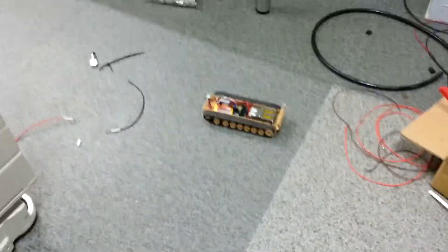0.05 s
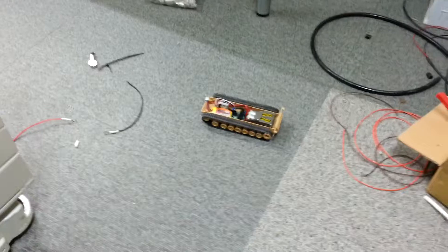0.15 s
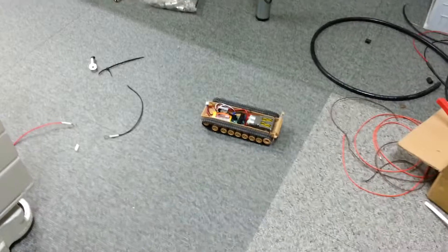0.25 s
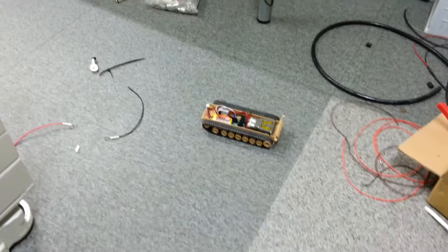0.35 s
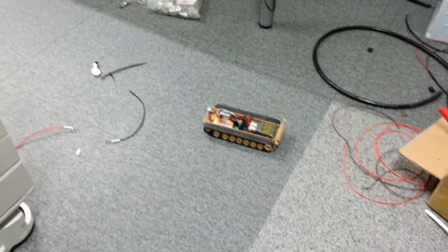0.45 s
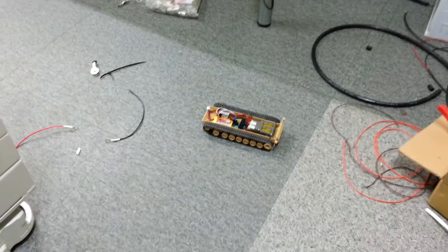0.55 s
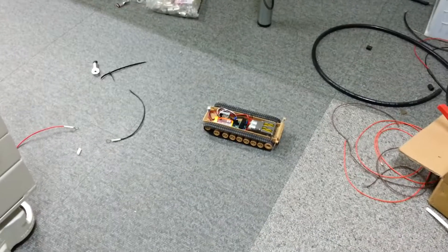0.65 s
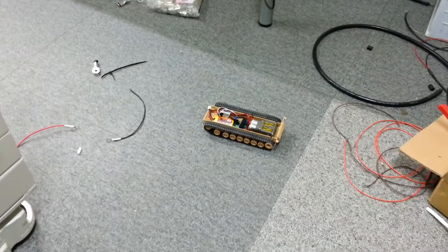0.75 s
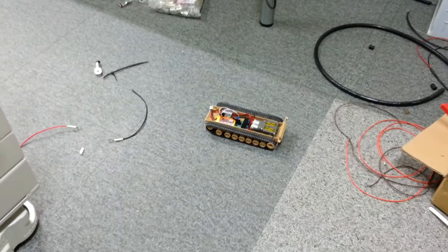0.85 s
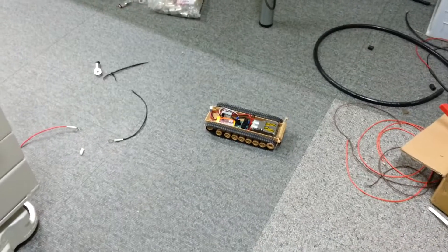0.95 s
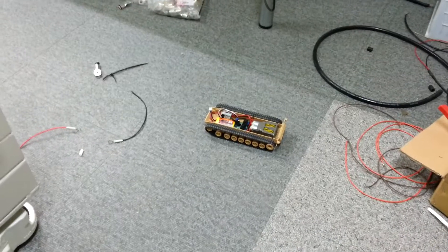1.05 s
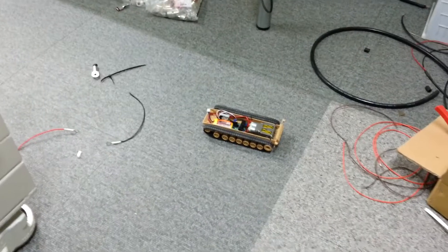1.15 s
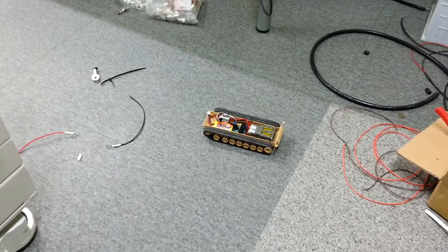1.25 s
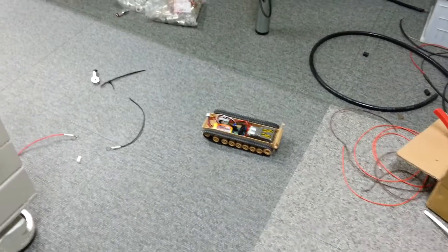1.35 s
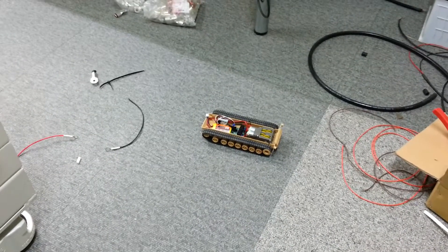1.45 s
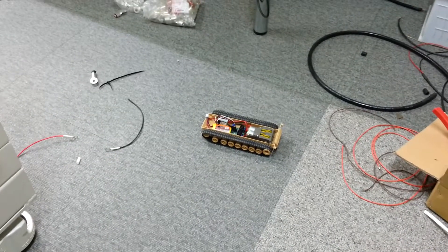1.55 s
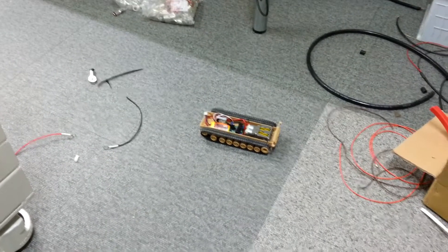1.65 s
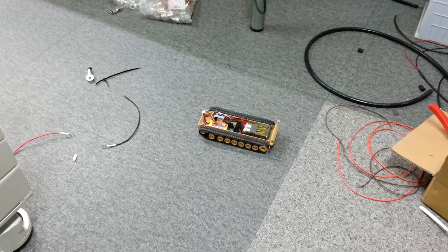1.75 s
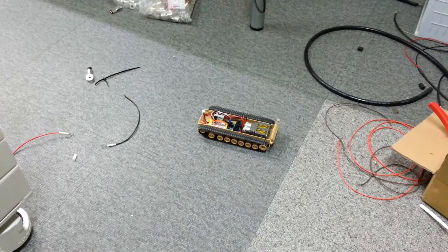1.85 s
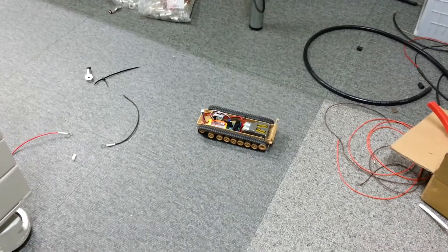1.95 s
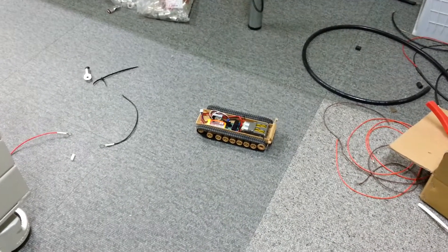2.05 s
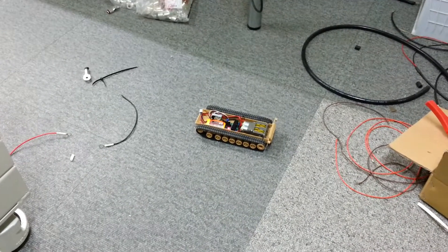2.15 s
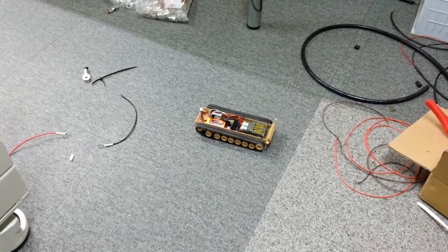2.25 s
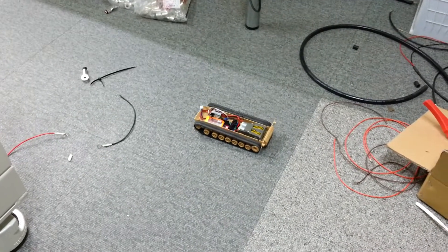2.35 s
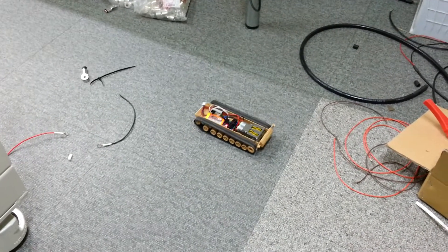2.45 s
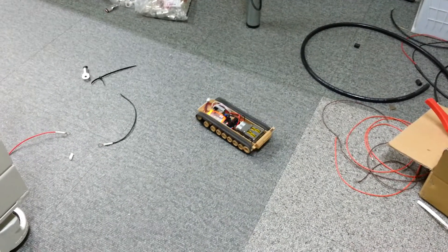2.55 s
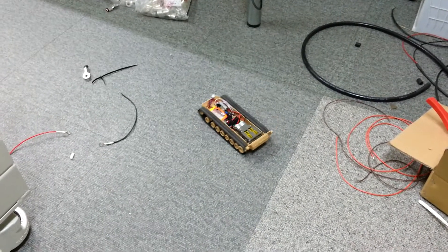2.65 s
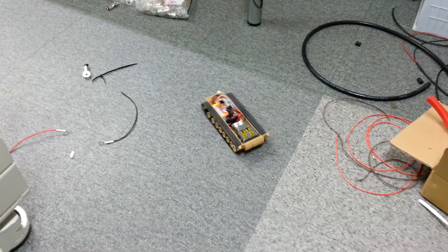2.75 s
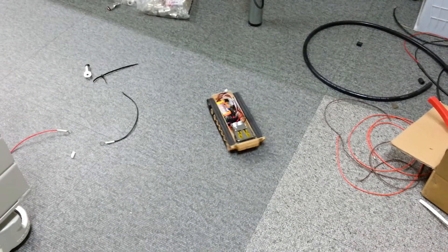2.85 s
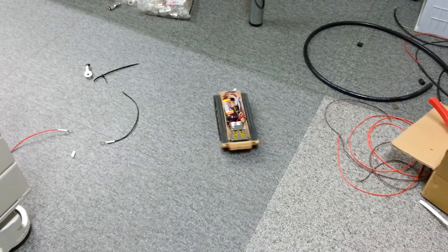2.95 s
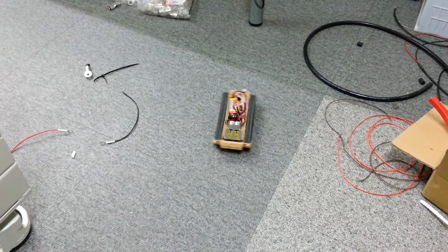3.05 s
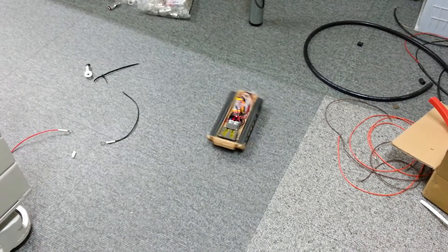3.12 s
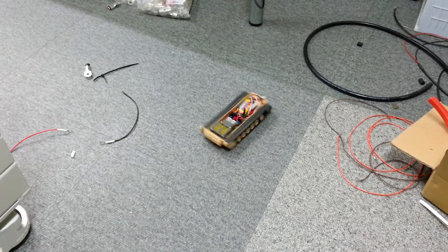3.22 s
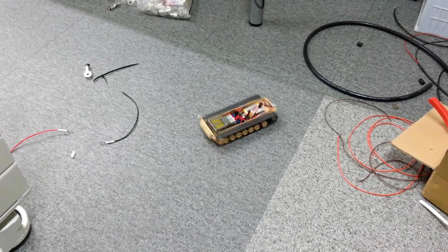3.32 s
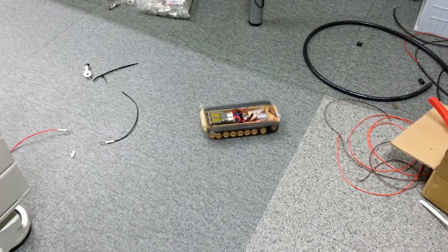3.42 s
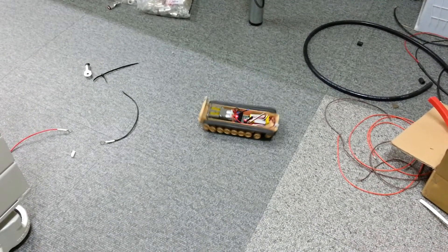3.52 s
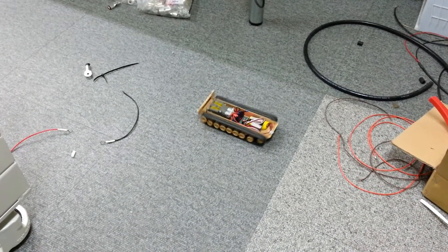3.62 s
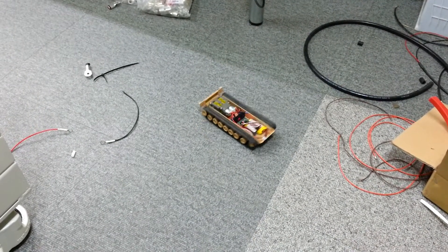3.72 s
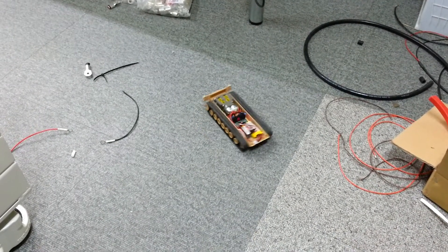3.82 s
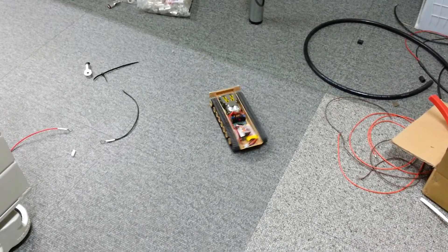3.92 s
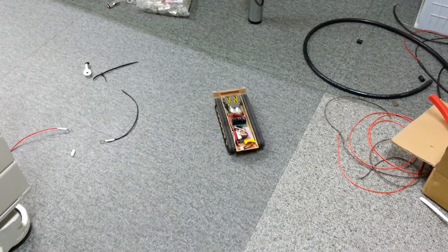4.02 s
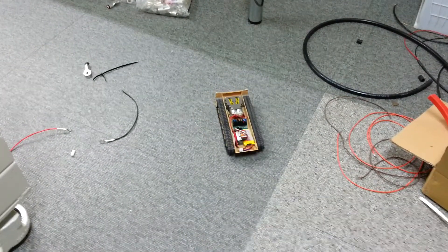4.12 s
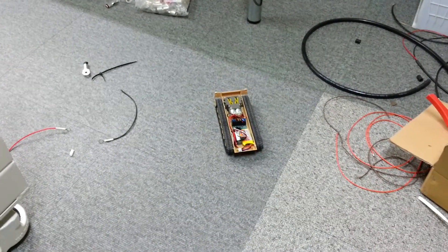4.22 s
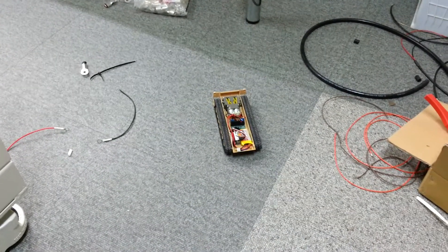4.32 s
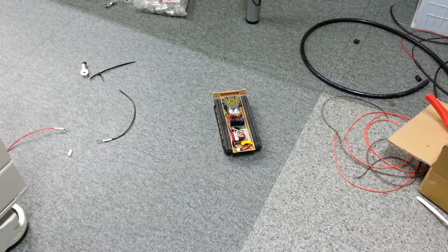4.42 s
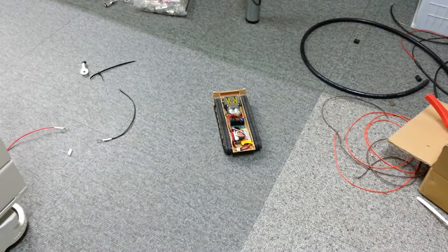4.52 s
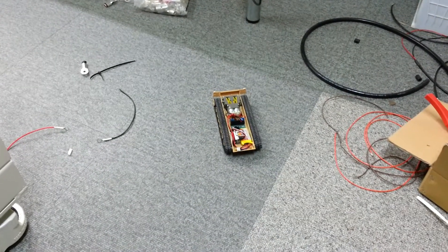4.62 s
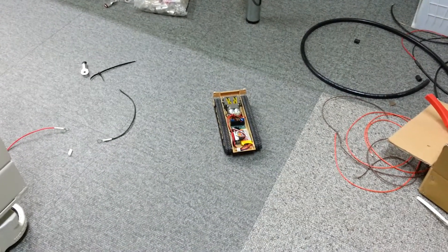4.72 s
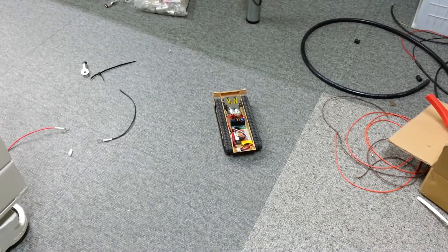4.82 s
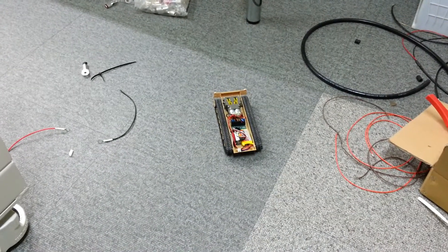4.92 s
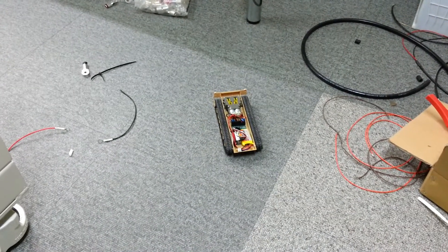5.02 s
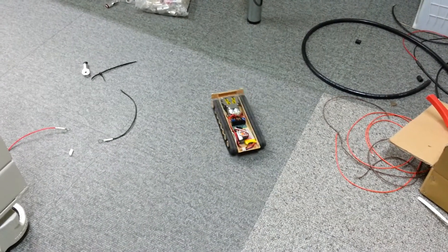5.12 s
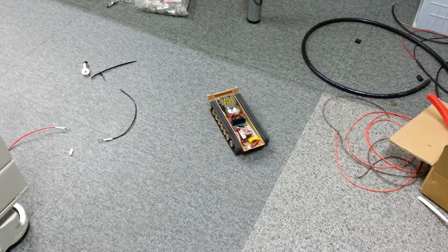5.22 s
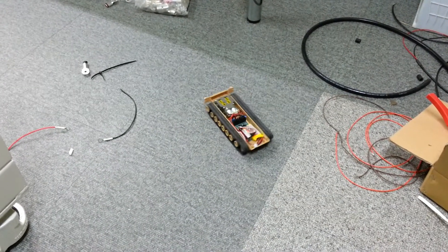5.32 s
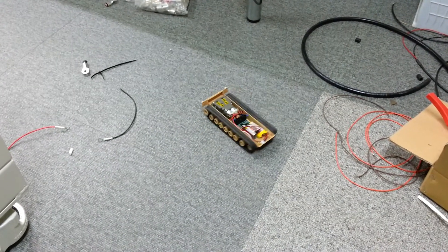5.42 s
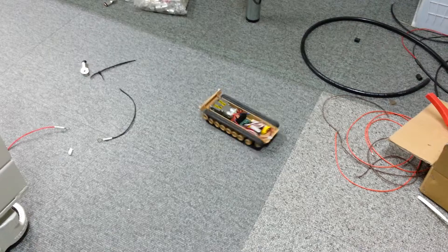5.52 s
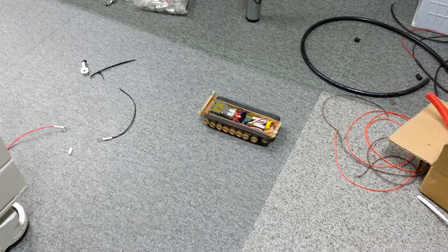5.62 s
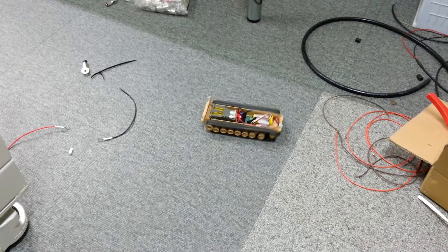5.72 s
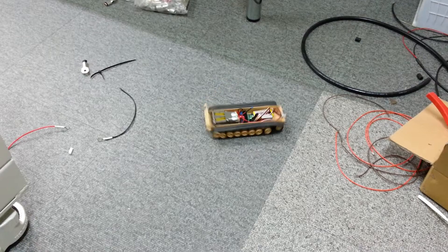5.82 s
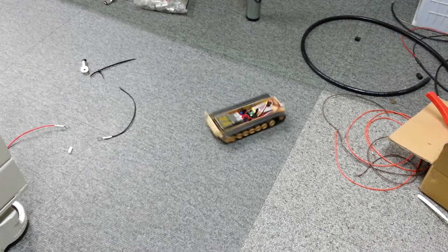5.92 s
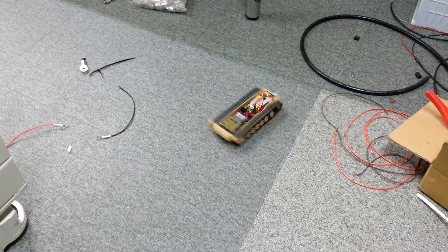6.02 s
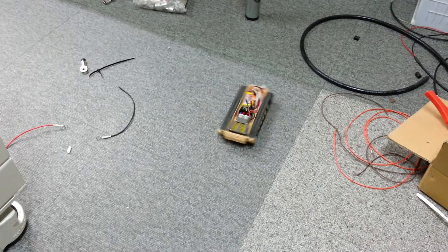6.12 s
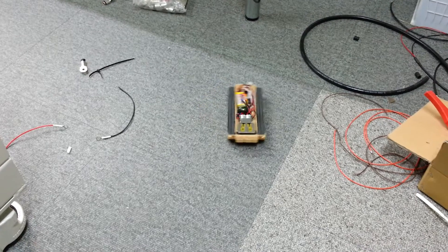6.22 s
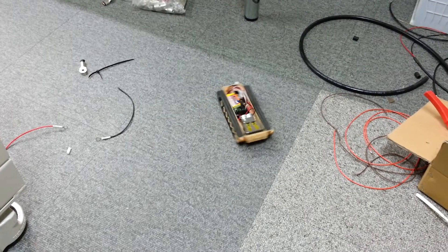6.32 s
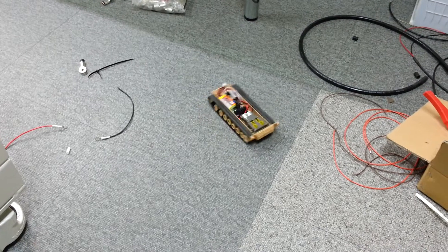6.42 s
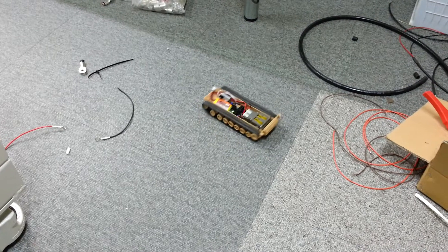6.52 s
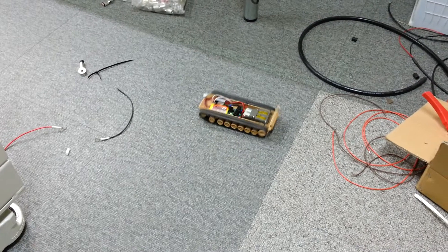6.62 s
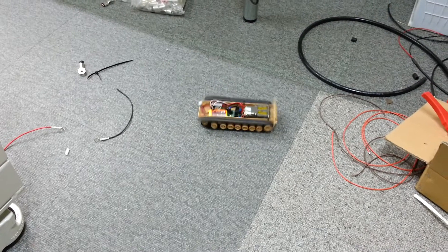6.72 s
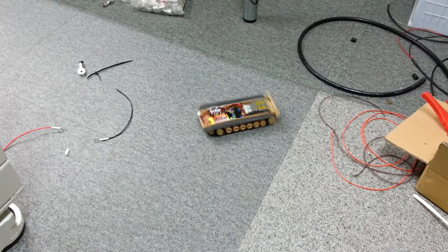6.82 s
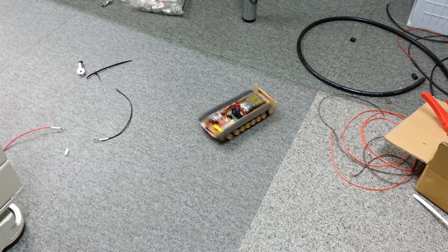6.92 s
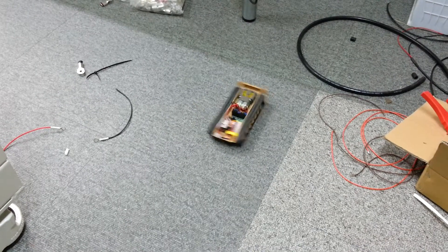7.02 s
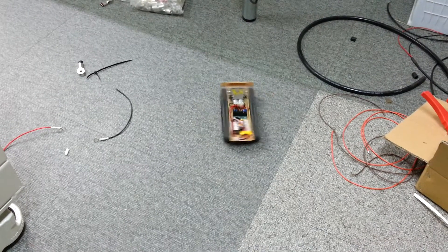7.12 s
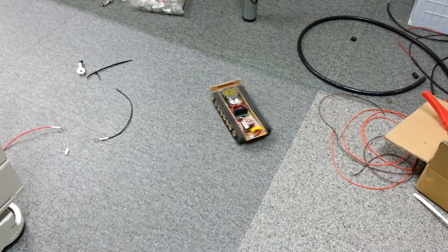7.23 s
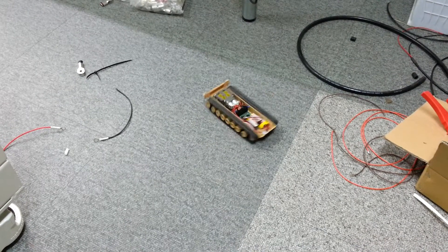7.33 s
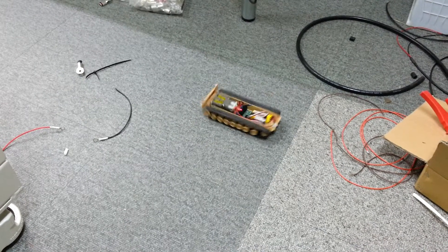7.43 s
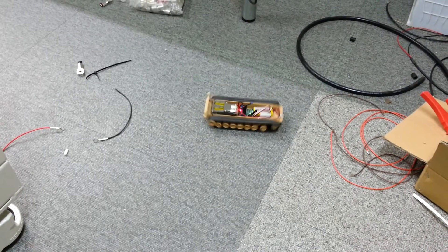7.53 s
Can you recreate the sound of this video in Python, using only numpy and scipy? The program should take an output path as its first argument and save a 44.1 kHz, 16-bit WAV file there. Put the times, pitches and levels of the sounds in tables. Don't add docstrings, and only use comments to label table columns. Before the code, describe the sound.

A quiet carpeted room with steady low room tone and soft hiss. Almost at once, at 0.04 s, a light plastic case is knocked close to the microphone, bouncing several times within a few hundredths of a second, then dragging grittily until about 0.3 s. A faint, grainy servo whine lies under it and dies by 1.2 s. Near quiet follows. At 2.2 s a small tracked model starts spinning: two little motors whine upward, rough and wavering, over loud, dry, plastic gear rattle. At about 4 s one surges briefly, then they slow and stop by 4.3 s. Quiet again until 5.0 s, when a second burst kicks in, dips briefly, then climbs higher and brighter, with beating whines, low hum and fizzy brush noise. One motor sags and restarts around 7.2 s; the rattle is still running at the 7.6 s end.

```python
import sys
import numpy as np
from scipy import signal
from scipy.fft import rfft, irfft, next_fast_len
from scipy.io import wavfile
from scipy.ndimage import uniform_filter1d, map_coordinates

SR = 44100
rng = np.random.default_rng(int(sys.argv[2]) if len(sys.argv) > 2 else 0)


def pcm_store(signal):
    levels = np.round(np.clip(np.atleast_2d(signal), -1, 1) * 32767)
    wavfile.write(sys.argv[1], SR, levels.astype(np.int16).T)


def gain_from_decibels(decibels):
    exponent = np.asarray(decibels, float) / 20
    return 10 ** exponent


N = 333837
TIME_S = np.arange(N) / SR


def unit(x):
    return x / np.sqrt(np.mean(np.abs(x) ** 2) + 1e-20)


def along(points, hz):
    point_hz, value = np.transpose(points)
    return np.interp(np.log(hz + 1), np.log(point_hz + 1), value)


def curves(rows, fade_s=0.011):
    start_s, *columns = np.transpose(rows)
    inside_s = np.minimum(TIME_S - start_s[0], start_s[-1] + fade_s - TIME_S)
    gate = np.clip(inside_s / fade_s, 0, 1)
    return [gate] + [np.interp(TIME_S, start_s, column) for column in columns]


def wobble(rate_hz):
    return map_coordinates(rng.standard_normal(N // 20), [TIME_S * rate_hz])


def filtered(x, response):
    size = next_fast_len(N + SR // 2)
    hz = np.fft.rfftfreq(size, 1 / SR)
    return irfft(rfft(x, size) * response(hz), size)[..., :N]


def coloured(x, spectrum):
    return unit(filtered(x, lambda hz: gain_from_decibels(along(spectrum, hz))))


def turning(shaft_hz, chatter=1):
    flutter = 0.012
    return np.cumsum(shaft_hz * (1 + flutter * chatter * wobble(45))) / SR


def order(turns, multiple, rough, rate_hz):
    slow = wobble(rate_hz) + 1j * wobble(rate_hz)
    fast = 0.55 * wobble(4 * rate_hz) + 0.6j * wobble(4 * rate_hz)
    error = (1 + rough * (slow + fast)) / np.sqrt(1 + 2 * rough ** 2)
    return unit(np.real(error * np.exp(2j * np.pi * multiple * turns)))


# centre_hz, width_hz, level_db
HULL_PANELS = [(1076, 200, -5.5), (1328, 32, 1), (1708, 36, 7.5), (1868, 88, 6), (2120, 110, 0),
               (2420, 82, -4.5), (3010, 250, 1.5), (3395, 78, 3.5), (4035, 30, 3), (4480, 320, -0.5)]


def hull(hz):
    response = 1
    for centre_hz, width_hz, level_db in HULL_PANELS:
        damping = 1j * hz * width_hz
        response = response + gain_from_decibels(level_db) * 0.5 * damping / (centre_hz ** 2 - hz ** 2 + damping)
    return response


# hz, level_db (per Hz)
GEAR_SPECTRUM = [(240, -61), (400, -33), (608, -27.5), (939, -17.5), (1410, -10), (1630, -4), (1980, -6),
                 (2140, -0.5), (2930, -1), (4010, -6), (5650, -19), (9690, -20), (14300, -26)]
# start_s, level_db, track_speed (0-1)
RATTLE_BURSTS = [
    [(2.172, -52, .5), (2.184, -39, 0.57), (2.272, -24.5, 0.44), (2.36, -18, 0.76), (3.2, -17, 0.91),
     (3.82, -16.5, 0.97), (4.0, -18.5, 0.8), (4.166, -35, 0.079), (4.3, -58, 0.074)],
    [(4.953, -37.5, 0.9), (4.977, -33.5, .6), (5.02, -28, 0.94), (5.1, -16, 0.74), (5.48, -19.5, 1.03),
     (6.08, -19, 0.97), (6.84, -16.5, 0.97), (7.22, -17, 0.98), (7.57, -18, 1.02)],
]
DULL_DB, BODY_DB, BRIGHT_DB, FIZZ_DB = -8.5, -4, -17, -27
DULL_GAIN_DB, BRIGHT_GAIN_DB, FIZZ_GAIN_DB = -9.5, 12, 14


def rattle():
    unevenness_db = 2.08 * wobble(260) + 0.37 * wobble(40) + 1.3 * wobble(11)
    teeth = filtered(coloured(rng.standard_normal(N) * gain_from_decibels(unevenness_db), GEAR_SPECTRUM), hull)

    def lowpass(hz, edge_hz):
        return 1 / (1 + (hz / edge_hz) ** 8)

    below = [filtered(teeth, lambda hz: lowpass(hz, edge_hz)) for edge_hz in (1400, 3500, 6000)]
    dull, body, bright = map(unit, np.diff([0 * teeth, *below], axis=0))
    hiss = coloured(rng.standard_normal((2, N)) * gain_from_decibels(0.39 * unevenness_db), GEAR_SPECTRUM)
    fizz = unit(filtered(hiss, lambda hz: 1 - lowpass(hz, 3800))) * gain_from_decibels([[4.2], [2.1]])
    clash, brush_level = np.zeros(N), np.zeros(N)
    for rows in RATTLE_BURSTS:
        gate, level_db, speed = curves(rows, fade_s=0.0052)
        mix = gain_from_decibels(BODY_DB) * body
        mix = mix + gain_from_decibels(DULL_DB + DULL_GAIN_DB * speed) * dull
        mix = mix + gain_from_decibels(BRIGHT_DB + BRIGHT_GAIN_DB * speed) * bright
        clash += gate * gain_from_decibels(level_db) * mix
        brush_level += gate * gain_from_decibels(level_db + FIZZ_DB + FIZZ_GAIN_DB * speed)
    hold_s = 0.035
    keep = np.exp(-1 / (hold_s * SR))
    return clash, signal.lfilter([1 - keep], [1, -keep], brush_level) * fizz


# start_s, shaft_hz, mesh_db, chatter
NEAR_SPELLS = [
    [(2.2, 139.7, -36, 1.1), (2.45, 190.2, -34, 1), (2.55, 207, -20, 0.61), (2.8, 269, -21.5, 0.58),
     (3.14, 315.4, -22.5, 1.36), (3.24, 324.2, -27, 0.95), (3.31, 329.6, -19.5, 0.29),
     (3.68, 343.8, -20, 0.26), (3.76, 348, -37, 0.51)],
    [(5.0, 119.7, -52.5, 1), (5.2, 195, -29, 1.07), (5.31, 222.7, -16.5, 0.74), (5.62, 304.4, -18, 0.61),
     (5.83, 364.7, -20.5, 0.74), (6.3, 405.6, -22.5, 1.25), (6.72, 421.2, -21.5, 0.99),
     (7.02, 495.5, -22.5, 1.04), (7.3, 508.4, -26.5, .8)],
]
# start_s, shaft_hz, mesh_db, chatter
NEAR_BREAKS = [
    [(3.97, 285, -32, 1.2), (4.0, 268, -24, 1.2), (4.05, 205, -29, 1.2), (4.12, 190, -40, 1.2)],
    [(7.19, 280, -30, .8), (7.26, 275, -23, .5), (7.32, 385, -21, .5), (7.38, 445, -17, .5),
     (7.43, 485, -17, .4), (7.5, 492, -27, .6)],
]
# shaft_multiple, level_db (re mesh)
NEAR_NEIGHBOURS = [(7, -6), (9, -10), (15, -27), (16, -10)]
# hz, level_db
MOUNT_RESPONSE = [(1100, -11), (1700, -1.5), (1980, -9), (2200, 1), (2600, -1.5), (2870, 2.5), (3600, -6.5),
                  (4000, 2.5)]
# hz, level_db
CASING_RESPONSE = [(2300, -9), (2900, 2), (3400, -9), (4500, -3), (5500, -16)]


def near_motor():
    mesh, neighbours = np.zeros(N), np.zeros(N)
    for rows in NEAR_SPELLS + NEAR_BREAKS:
        gate, shaft_hz, mesh_db, chatter = curves(rows, fade_s=0.022)
        turns = turning(shaft_hz, chatter)
        level = gate * gain_from_decibels(mesh_db)
        for multiple, level_db in NEAR_NEIGHBOURS:
            neighbours += level * chatter * gain_from_decibels(level_db) * order(turns, multiple, rough=0.63, rate_hz=70)
        beat = 1 + 0.5 * np.cos(2 * np.pi * turns / 6.9 + 1.36 * wobble(12))
        mesh += level * beat * order(turns, multiple=8, rough=chatter, rate_hz=95)
    carried_mesh = filtered(mesh, lambda hz: gain_from_decibels(along(MOUNT_RESPONSE, hz)))
    return carried_mesh + filtered(neighbours, lambda hz: gain_from_decibels(along(CASING_RESPONSE, hz)))


# start_s, shaft_hz, mesh_db, shake_db
FAR_SPELLS = [
    [(2.2, 140, -48, -39), (2.36, 228.3, -26.5, -2), (2.45, 309.4, -45, -14), (2.5, 325, -36, -19.5)],
    [(3.1, 345, -37, -10), (3.5, 367, -26, 2), (3.65, 369, -23, -6), (3.8, 380, -28, -22),
     (3.88, 400, -22, -8), (3.92, 452, -23, -12), (3.98, 400, -26, -16), (4.05, 340, -43, -24)],
    [(5.045, 222, -24, -10), (5.14, 292, -17, -10), (5.2, 282, -27, -12), (5.28, 275, -38, -6)],
    [(5.7, 329.8, -31, -5), (5.85, 360.3, -18, -1), (6.3, 408, -37, 1), (6.6, 413, -25, 0.5),
     (6.8, 445.7, -24.5, 3), (7.02, 508.5, -24, -4.5), (7.19, 540.5, -31, -5), (7.37, 531, -23, -5),
     (7.57, 553.3, -36, 0)],
]
# shaft_multiple, level_db (re tenth order)
FAR_SIDES = [(2, -17), (5, -3), (12.5, -11)]
# shaft_hz, level_db
HUM_RADIATION = [(250, -12), (340, -1.5), (380, -7), (550, 7)]
HUM_DB, TENTH_DB = -52, -38
TENTH_FOLLOWS = 0.84
TENTH_DB_PER_HZ = 0.0691


def far_motor():
    whine = np.zeros(N)
    for rows in FAR_SPELLS:
        gate, shaft_hz, mesh_db, shake_db = curves(rows, fade_s=0.026)
        turns = turning(shaft_hz)
        commutator = order(turns, multiple=10, rough=0.3, rate_hz=60)
        for multiple, level_db in FAR_SIDES:
            commutator = commutator + gain_from_decibels(level_db) * order(turns, multiple, rough=0.7, rate_hz=65)
        tenth_db = TENTH_DB + TENTH_FOLLOWS * shake_db + TENTH_DB_PER_HZ * (shaft_hz - 400)
        hum_db = HUM_DB + shake_db + along(HUM_RADIATION, shaft_hz)
        hum = gain_from_decibels(hum_db) * order(turns, multiple=1.0, rough=0.15, rate_hz=22)
        mesh = gain_from_decibels(mesh_db) * order(turns, multiple=8, rough=1.3, rate_hz=95)
        whine += gate * (mesh + gain_from_decibels(tenth_db) * commutator + hum)
    return whine


# pitch_hz, level_db, t60_s (here the time of a 400 dB fall)
CASE_MODES = [(440, -8, 0.58), (760, -4, 0.13), (1390, 10.5, 0.086), (1510, -2, 0.029), (2070, 9, 0.035),
              (2470, 0.5, 0.061), (3200, -15, 0.043)]
# start_s, level_db
SCRAPE_LEVEL = [
    (0, -44),
    (.042, -45.5),
    (.048, -30.5),
    (.1, -35.5),
    (.19, -34.5),
    (.225, -33.5),
    (.3, -36.5),
    (.34, -48.5),
    (.75, -60),
]
# hz, level_db (per Hz)
RUBBED_SPECTRUM = [(120, -63), (200, -33), (380, -18.5), (1030, -7.5), (1260, -5.5), (1590, -7), (2230, -2),
                   (6400, -22.5), (14300, -33.5)]
# start_s, level_db
CASE_KNOCKS = [
    (.0438, -22),
    (.0458, -3),
    (.0495, -4),
    (.0544, -9),
    (.063, -13),
    (.072, -11),
    (.083, -17),
]


def case():
    knocks, t_s = np.zeros(N), np.arange(SR // 4) / SR
    crack_band = signal.butter(2, [900, 2900], "band", fs=SR)
    for start_s, level_db in CASE_KNOCKS:
        ring = np.zeros(len(t_s))
        for pitch_hz, mode_db, t60_s in CASE_MODES:
            decay_db = mode_db + rng.normal(0, 3) - 400 * t_s / t60_s
            ring += gain_from_decibels(decay_db) * np.sin(2 * np.pi * pitch_hz * t_s)
        crack = signal.lfilter(*crack_band, rng.standard_normal(len(t_s))) * gain_from_decibels(-60 * t_s / 0.009)
        knocks[round(start_s * SR):][:len(t_s)] += gain_from_decibels(level_db - 18.5) * (ring + 16 * crack)
    gate, level_db = curves(SCRAPE_LEVEL, fade_s=0.0031)
    grit = coloured(rng.standard_normal(N) * gain_from_decibels(1.2 * wobble(149.5)), RUBBED_SPECTRUM)
    light = signal.butter(4, [330, 5200], "band", fs=SR, output="sos")
    return signal.sosfilt(light, knocks) + gate * gain_from_decibels(level_db) * grit


def tick():
    start_s, level_db = np.transpose(CASE_KNOCKS)[:, :, None]
    since_s = TIME_S - start_s
    t60_s = 0.011
    shape = (gain_from_decibels(level_db - 60 * np.abs(since_s) / t60_s) * (since_s > 0)).sum(0)
    noise = gain_from_decibels(-27.5) * shape * rng.standard_normal((2, N))
    return filtered(noise, lambda hz: 1 / (1 + (5000 / (hz + 1)) ** 4))


# start_s, pitch_hz, level_db
SERVO_WHINE = [
    (.17, 2230, -50),
    (.27, 2230, -44),
    (.36, 2235, -63),
    (.9, 2245, -62),
    (1.16, 2230, -67),
]


def servo():
    gate, pitch_hz, level_db = curves(SERVO_WHINE, fade_s=0.05)
    return gate * gain_from_decibels(level_db) * order(np.cumsum(pitch_hz) / SR, multiple=1, rough=3, rate_hz=160)


# hz, t60_s
WALL_DECAY = [(300, .25), (2000, 0.33), (10000, 0.38)]


def room(x, size=16384):
    out = np.zeros((2, N + 3 * SR))
    window = np.sin(np.pi * np.arange(size) / size)
    padded = np.pad(x, (size // 2, size))
    for start in range(0, N + size // 2, size // 2):
        hz, t_s, z = signal.stft(rng.standard_normal((2, size)), SR, nperseg=256)
        decay = gain_from_decibels(-60 * t_s / along(WALL_DECAY, hz)[:, None])
        tail = signal.istft(z * decay, SR, nperseg=256)[1]
        tail = tail / np.linalg.norm(tail[0])
        piece = signal.fftconvolve((window * padded[start:][:size])[None], tail, axes=1)
        out[:, start:][:, :piece.shape[1]] += piece
    return out[:, size // 2 - 200:][:, :N]


# hz, left_minus_right_db
PORT_LEAN = [(60, -10.5), (130, -2), (290, -3), (640, 1.5), (1410, -5), (3100, -9), (6820, -3), (15000, 12)]
# hz, room_over_direct_db
ROOM_SHARE = [(300, 1), (1400, 2), (3000, -7), (7000, 19.5)]


def heard(x, lean, lag_s, wet_db):
    side = np.array([[0.5], [-0.5]])

    def wet(hz):
        return gain_from_decibels(along(ROOM_SHARE, hz) + wet_db)

    def ports(hz):
        return gain_from_decibels(side * lean * along(PORT_LEAN, hz))

    def at_ports(hz):
        return 1.743 * ports(hz) / np.hypot(*ports(hz)) * np.exp(2j * np.pi * hz * lag_s * side)

    direct = filtered(x, lambda hz: 1 / np.hypot(1, wet(hz)))
    tail = filtered(room(x), lambda hz: wet(hz) / np.hypot(1, wet(hz)))
    return filtered(direct + tail, at_ports)


# hz, level_db (per Hz)
AIR_SPECTRUM = [(18, -46), (30, -24), (236, -10.5), (348, -8), (417, -7), (717, -9), (837, -5.5),
                (904, -9.5), (1260, -11), (1520, -10.5), (1680, -12), (1810, -11), (5800, -23),
                (14300, -21)]
# hz, left_right_likeness (-1 to 1)
AIR_LIKENESS = [(60, -0.004), (180, 0.17), (550, 0.64), (1650, -0.21), (4970, 0.011), (15000, 0.14)]
AIR_DB = -53.5


def air():
    def spread(hz):
        turn = np.arccos(np.clip(along(AIR_LIKENESS, hz), -1, 1)) / 2
        return gain_from_decibels(along(AIR_SPECTRUM, hz)) * [np.cos(turn), np.sin(turn)]

    mid, side = filtered(rng.standard_normal((2, N)), spread)
    return gain_from_decibels(AIR_DB + 3.0) * unit(np.array([mid + side, mid - side])) * gain_from_decibels([[-0.5], [0.5]])


def scene():
    clash, brush = rattle()
    motors = heard(near_motor() + far_motor(), lean=1.06, lag_s=4.5e-5, wet_db=-3)
    chassis = motors + heard(clash, lean=1.04, lag_s=4.5e-5, wet_db=1.5) + brush
    handling = heard(case() + servo(), lean=0.91, lag_s=3e-5, wet_db=-2) + tick()
    return chassis + handling + air()


# hz, level_db (under the whole)
BAND_FLOOR = [(40, -50), (300, -45), (500, -43), (680, -43), (800, -60), (9500, -56), (12200, -45.5),
              (14400, -45)]
TOP_HZ = 14550


def masked(x, width_bins=4):
    hz, _, z = signal.stft(x, SR, "cosine", nperseg=2048)
    power = np.add.reduceat((np.abs(z) ** 2).sum(0), np.arange(0, len(hz), width_bins))
    total = uniform_filter1d(power.sum(0), 3)
    keep = power > total * gain_from_decibels(2 * along(BAND_FLOOR, hz[::width_bins]))[:, None]
    keep = keep[np.arange(len(hz)) // width_bins] & (hz < TOP_HZ)[:, None]
    return signal.istft(z * keep, SR, "cosine", nperseg=2048)[1][:, :N]


def band_limit(x):
    return signal.sosfilt(signal.butter(12, 15770, fs=SR, output="sos"), x)


def record(dry):
    ceiling = dry / (1 + np.abs(dry / 1.02) ** 12) ** (1 / 12)
    mix = masked(ceiling)
    return band_limit(mix)


dry = scene()
out = record(dry)
pcm_store(out)
```